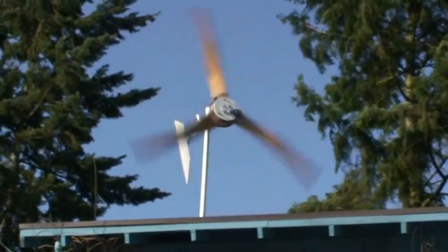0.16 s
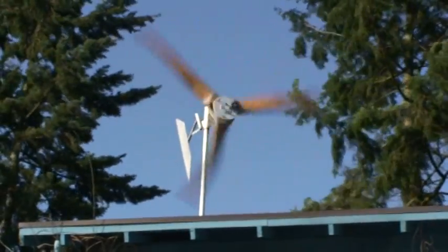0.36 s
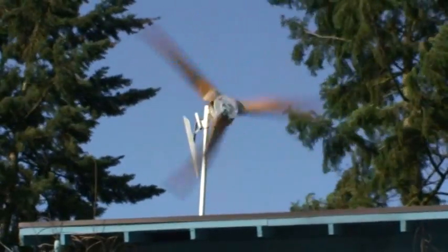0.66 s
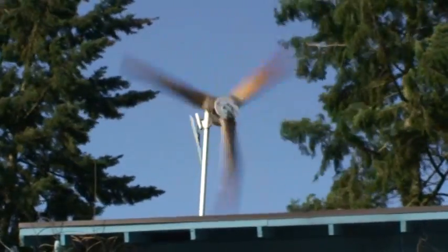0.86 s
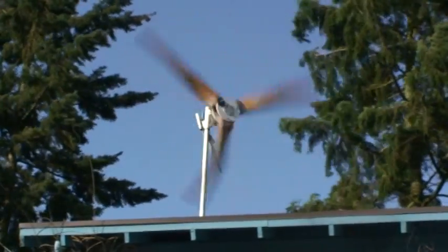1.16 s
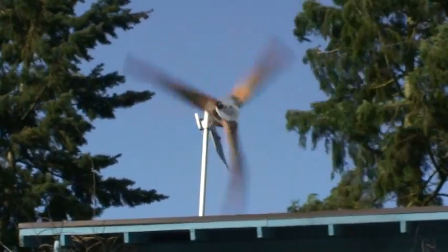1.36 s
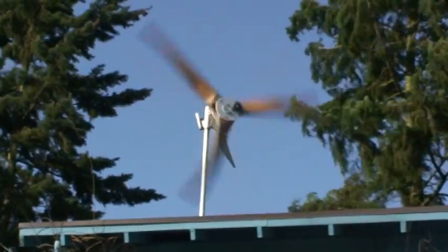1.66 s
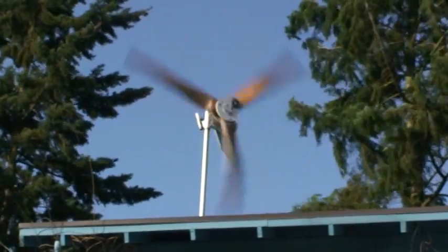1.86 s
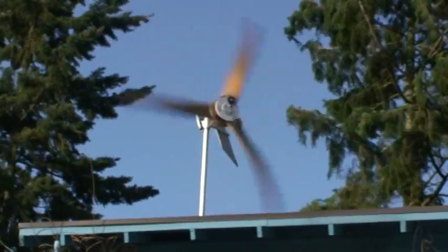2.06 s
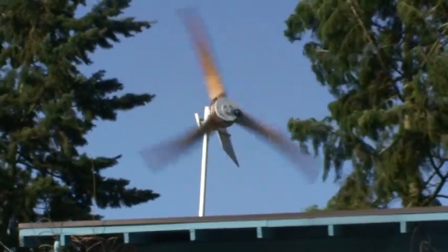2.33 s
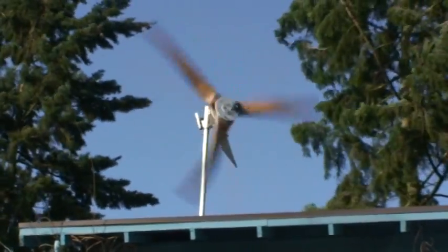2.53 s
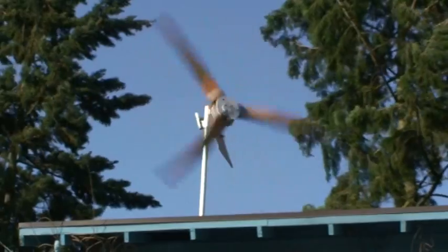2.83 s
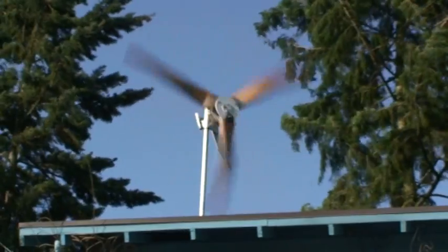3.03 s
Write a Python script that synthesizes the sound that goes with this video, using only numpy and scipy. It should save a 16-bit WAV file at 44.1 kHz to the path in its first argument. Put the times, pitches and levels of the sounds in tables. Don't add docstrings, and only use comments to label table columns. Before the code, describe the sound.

Gusty wind hits a small camera's two microphone holes, making low, rough rumble with rapid irregular thumps and dry snaps, differing left and right. It is strongest and deepest at the start; around 0.5 s the input chokes and clicks, and near 0.7 s a tiny rising whistle slips by. Buffeting continues, its steady flow thinning around 2.3 s, then puffs return until 3.2 s. Faint needle and blade hiss lies behind.

```python
import sys
import numpy as np
from scipy import signal
from scipy.fft import rfft, irfft, next_fast_len
from scipy.io import wavfile
from scipy.ndimage import uniform_filter1d

SR = 44100
rng = np.random.default_rng(int(sys.argv[2]) if len(sys.argv) > 2 else 0)


def invert_db(level):
    return 10 ** (np.asarray(level, dtype=float) / 20)


def dump(signal):
    limited = np.clip(np.atleast_2d(signal).T, -1, 1)
    pcm = np.round(limited * 32767).astype(np.int16)
    wavfile.write(sys.argv[1], SR, pcm)


N = 140679


def rms_one(x):
    return x / np.sqrt(np.mean(x ** 2) + 1e-20)


def filtered(x, order, hz, kind="low"):
    return signal.sosfilt(signal.butter(order, hz, kind, fs=SR, output="sos"), x)


def filtered_both_ways(x, hz, kind="low"):
    return signal.sosfiltfilt(signal.butter(2, hz, kind, fs=SR, output="sos"), x)


def in_time(rows):
    seconds, *columns = np.transpose(rows)
    return [np.interp(np.arange(N) / SR, seconds, column) for column in columns]


def at_hz(points, hz):
    known_hz, values = np.array(points).T[:2]
    return np.interp(np.log(hz), np.log(known_hz), values)


def drift(rate, channels=1):
    pole = np.exp(-80 * np.pi * rate / SR)
    noise = rng.standard_normal((channels, N // 40 + 2002))
    slow = signal.lfilter([1], [1, -2 * pole, pole * pole], noise)[:, 2000:]
    time = np.arange(N) / 40
    return np.array([np.interp(time, np.arange(len(path)), rms_one(path)) for path in slow])


def octaves(source, spectrum, likeness, centres):
    # pitch in Hz, left minus right in dB.
    port_difference = [(60, 1), (180, 2.5), (550, 1), (1650, -2.5), (4970, -1.5), (15000, 1)]
    size = next_fast_len(N)
    hz = np.maximum(np.arange(size // 2 + 1) * SR / size, 1)
    alike = np.clip(at_hz(likeness, hz), -.99, .99)
    for centre in centres:
        left, right = rfft(source(centre), size)
        mid = np.sqrt(1 + alike) * (left + right) / 2
        side = np.sqrt(1 - alike) * (left - right) / 2
        slice_gain = np.clip(1 - abs(np.log2(hz / centre)), 0, 1) * invert_db(at_hz(spectrum, hz))
        lean = invert_db(at_hz(port_difference, centre) * np.array([[.5], [-.5]]))
        stereo = irfft(slice_gain * np.array([mid + side, mid - side]), size)[:, :N]
        yield centre, lean * stereo


def pokes(rate):
    chance, direction, size = rng.random((3, 2, N))
    spread_db = 2.5
    sizes = invert_db(-spread_db * np.log(size + 0.0029))
    return rms_one((chance < rate / SR) * np.sign(direction - .5) * sizes)


def evened(band, hz):
    even_s, even_share = .045, .6
    power = uniform_filter1d(np.mean(band ** 2, axis=0), int(max(even_s, 4 / hz) * SR))
    return band * (power / power.mean() + .02) ** (-even_share / 2)


def buffeting(gain):
    # time in seconds, level in dB, brightness in dB per octave.
    flow_rows = [(0, -20.5, -14), (.13, -29, -5.5), (.28, -28.5, -6.5), (.42, -26.5, 7), (.57, -31.5, 9.5),
                 (.69, -30, 8), (.9, -23.5, 1), (1.1, -27, 2), (1.19, -32, 3.5), (1.3, -27.5, 1.5),
                 (1.7, -28.5, 1), (1.98, -27, -1.5), (2.07, -34.5, 0), (2.3, -44.5, 3), (2.6, -33.5, -7),
                 (2.9, -24.5, -1.5), (3.02, -36.5, -1), (3.19, -39.5, -10)]
    # centre in seconds, length in seconds, level in dB, brightness in dB per octave.
    puff_rows = [(0.017, 0.039, -25, 1), (0.072, 0.04, -25, 3.5), (0.213, 0.07, -22.5, 1.5),
                 (0.329, 0.031, -19.5, -1), (0.366, 0.035, -24.5, 0), (0.45, 0.024, -22.5, -7),
                 (0.491, 0.041, -27.5, 6), (0.604, 0.055, -28.5, -27), (0.772, 0.071, -28.5, 5.5),
                 (0.961, 0.034, -26, 1), (1.029, 0.052, -29.5, 5), (1.265, 0.012, -20.5, 2),
                 (1.412, 0.098, -28, 0), (1.483, 0.049, -28.5, 4), (1.635, 0.028, -30.5, 6.5),
                 (1.791, 0.063, -25, -1), (1.992, 0.075, -26, 3.5), (2.084, 0.02, -25, 1),
                 (2.149, 0.041, -22, -3.5), (2.22, 0.049, -26.5, -2.5), (2.271, 0.015, -22.5, -8.5),
                 (2.334, 0.024, -22.5, -4), (2.412, 0.074, -25.5, 1), (2.499, 0.07, -34.5, 1.5),
                 (2.567, 0.051, -25.5, 0), (2.711, 0.031, -23, 1), (2.791, 0.045, -21, -4),
                 (2.919, 0.04, -27.5, -0.5), (3.075, 0.025, -22, -0.5), (3.137, 0.0095, -27.5, -5)]
    # pitch in Hz, strength in dB per Hz.
    eddy_spectrum = [(13, -18), (25, -5), (45, 0), (90, -1), (200, -2.5), (450, -7.5), (900, -22),
                     (1500, -35), (2600, -51)]
    # pitch in Hz, left-right likeness (1 is the same).
    eddy_likeness = [(30, 1), (60, 0.99), (130, 0.59), (290, -0.045), (640, -0.24), (1400, 0.35)]
    eddies_per_cycle, big_eddies_per_s = .7, 200
    big_share, big_top_hz = .56, 524
    lump_db, lumps_per_s = 1.6, 22
    pivot_hz, tilt_octaves = 220, 2.02
    puff_edge = 6.0
    smear_cycles = 2.16

    t = np.arange(N) / SR
    flow_db, tilt_db = in_time(flow_rows)
    big = signal.hilbert(pokes(big_eddies_per_s)).imag
    lumps = drift(lumps_per_s, channels=2)
    shapes = [np.exp(-abs(2 * (t - s) / length) ** puff_edge) for s, length, _, _ in puff_rows]

    def eddies(hz):
        share = big_share / (1 + (hz / big_top_hz) ** 2)
        return np.sqrt(share) * big + np.sqrt(1 - share) * pokes(eddies_per_cycle * hz)

    out, plain = 0, 0
    for hz, band in octaves(eddies, eddy_spectrum, eddy_likeness, 25 * 2. ** np.arange(8)):
        band = evened(band, hz)
        up = np.clip(np.log2(hz / pivot_hz), 0, tilt_octaves)
        steady = gain * invert_db(flow_db + tilt_db * up + lump_db * lumps)
        puff_power = 0
        for (_, _, db, bright_db), shape in zip(puff_rows, shapes):
            puff_power = puff_power + invert_db(2 * (db + bright_db * up)) * shape
        strength = np.sqrt(steady ** 2 + puff_power)
        out = out + band * uniform_filter1d(strength, int(smear_cycles * SR / hz) + 1)
        plain = plain + band
    return out / np.sqrt(np.mean(plain ** 2))


def lone_eddies(rows):
    pull_share, calm_widths = .55, 2.1
    t, out, room = np.arange(N) / SR, 0, 0
    for s, width, *heights in rows:
        u = np.maximum((t - s) / width + .6, 0)
        push = 5.1 * u ** 2 * np.exp(-u ** 2 * 1.9)
        pull = pull_share * np.minimum(u, 1) * np.exp(-(u - 2.1) ** 2)
        out = out + (push - pull) * np.array(heights)[:, None]
        room = np.maximum(room, np.exp(-((t - s - width) / (calm_widths * width)) ** 2))
    return out, room


def wind(gain):
    # time in seconds, width in seconds, height.
    thump_rows = [(0.0046, 0.0054, 0.15), (0.0418, 0.0052, 0.13), (0.082, 0.0028, 0.11),
                  (0.1998, 0.0033, 0.1), (0.2351, 0.0032, -0.088), (0.3225, 0.0021, 0.18),
                  (0.3575, 0.0032, 0.15), (0.4562, 0.004, -0.2), (0.5021, 0.004, -0.13),
                  (0.6854, 0.0081, -0.14), (0.7381, 0.014, 0.11), (0.8398, 0.0059, 0.027),
                  (0.9665, 0.0047, -0.13), (1.0028, 0.0026, -0.17), (1.2468, 0.0032, 0.075),
                  (1.3299, 0.0053, -0.057), (1.3748, 0.0043, 0.099), (1.4124, 0.0025, 0.13),
                  (1.4707, 0.0029, 0.12), (1.6309, 0.0034, 0.12), (1.7484, 0.0019, -0.17),
                  (1.7938, 0.004, -0.024), (1.8356, 0.0021, -0.084), (1.9382, 0.0018, -0.15),
                  (1.9774, 0.0094, -0.11), (2.0332, 0.0068, -0.15), (2.1556, 0.0031, 0.16),
                  (2.2253, 0.0031, 0.11), (2.363, 0.0021, 0.11), (2.4309, 0.0095, -0.14),
                  (2.545, 0.0025, 0.096), (2.5874, 0.0066, -0.11), (2.6459, 0.0044, -0.091),
                  (2.7084, 0.0066, -0.16), (2.7673, 0.0086, -0.12), (2.8058, 0.0032, 0.12),
                  (2.9095, 0.0026, 0.14), (3.0754, 0.0034, 0.15)]
    # time in seconds, width in seconds, height left, height right.
    snap_rows = [(0.0068, 0.0011, 0.033, -0.35), (0.0533, 0.001, 0.097, -0.32),
                 (0.0865, 0.00057, -0.13, -0.089), (0.2071, 0.0014, 0.079, -0.27),
                 (0.2366, 0.00075, -0.18, 0.25), (0.3237, 0.0013, 0.25, -0.43),
                 (0.4278, 0.00063, 0.15, -0.17), (0.452, 0.00065, 0.18, -0.38),
                 (0.505, 0.0005, -0.48, 0.29), (0.6529, 0.00095, 0.022, 0.26),
                 (0.6903, 0.00069, 0.071, -0.32), (0.7398, 0.0005, 0.00019, -0.11),
                 (0.798, 0.0008, -0.29, 0.036), (0.82, 0.00067, -0.32, 0.13),
                 (0.8417, 0.0011, -0.21, -0.056), (0.8821, 0.0018, -0.37, -0.12),
                 (0.9131, 0.0008, 0.047, -0.28), (0.9463, 0.0014, -0.081, -0.29),
                 (1.0053, 0.0016, -0.21, 0.091), (1.0372, 0.00067, -0.15, 0.21),
                 (1.0649, 0.0011, -0.016, 0.26), (1.0998, 0.0016, -0.18, -0.28),
                 (1.266, 0.0015, 0.24, 0.15), (1.3136, 0.0021, 0.17, 0.39), (1.3391, 0.0012, 0.1, -0.13),
                 (1.4175, 0.0016, 0.21, -0.07), (1.4786, 0.0015, -0.24, -0.18), (1.505, 0.002, 0.35, 0.4),
                 (1.6007, 0.001, 0.18, -0.067), (1.632, 0.0013, 0.12, -0.22),
                 (1.6656, 0.00066, -0.25, 0.088), (1.7739, 0.00095, 0.083, -0.25),
                 (1.8176, 0.00073, -0.1, 0.033), (1.8376, 0.0018, 0.47, -0.033),
                 (1.9428, 0.00063, -0.14, 0.18), (1.9679, 0.0014, 0.2, -0.16),
                 (1.9891, 0.00074, 0.23, 0.18), (2.0353, 0.001, -0.22, -0.099),
                 (2.1363, 0.00093, 0.14, 0.16), (2.3853, 0.0023, -0.23, 0.33),
                 (2.4122, 0.0013, -0.038, -0.25), (2.4399, 0.00058, -0.21, 0.099),
                 (2.557, 0.00087, -0.011, 0.24), (2.6874, 0.001, 0.21, -0.032),
                 (2.7197, 0.0011, 0.054, -0.4), (2.7782, 0.0016, 0.17, 0.23),
                 (2.9054, 0.0011, 0.37, -0.025), (3.0774, 0.0009, 0.32, -0.17)]
    # time in seconds, width in seconds,
    # height left, height right.
    further_snap_rows = [(.464, 0.0021, 0.5, 0.083), (.4893, 0.00041, 0.19, 0.096), (0.596, 0.0017, -0.016, -0.11),
                         (2.332, 0.00081, 0.077, .096), (2.807, 0.00074, 0.11, 0.092), (2.934, 0.001, 0.16, 0.014)]
    thump_calm, snap_calm = .61, .75
    stream = buffeting(gain)
    thumps, deep_room = lone_eddies(thump_rows)
    snaps, sharp_room = lone_eddies(snap_rows + further_snap_rows)
    deep = filtered_both_ways(stream, 257)
    snaps = filtered_both_ways(snaps, 200, "high")
    thumps = filtered_both_ways(thumps, 35, "high")
    calmed_deep = deep * (1 - thump_calm * deep_room)
    calmed_rest = (stream - deep) * (1 - snap_calm * sharp_room)
    return calmed_deep + calmed_rest + thumps + snaps


def whistle():
    centre_s, length_s, level_db = .705, .0566, -31
    hz, rise_hz_per_s = 719, 6500
    t = np.arange(N) / SR - centre_s
    shape = np.exp(-(2 * t / length_s) ** 2) * invert_db(level_db + 7.2 * drift(60))
    return shape * np.sin(2 * np.pi * (hz * t + rise_hz_per_s * t ** 2 / 2) + drift(45))


def clicks():
    # time in seconds, height, rise time in seconds.
    jump_rows = [(.51655, .25, .00005), (.5186, -.15, .00004), (.51865, -.5, .00024), (.5189, .37, .00004),
                 (.51985, -.17, .00005)]
    right_late_s = .000006
    t = np.arange(N) / SR - np.array([[0], [right_late_s]])
    jumps = sum(height * np.clip((t - s) / rise, 0, 1) for s, height, rise in jump_rows)
    sag = filtered(jumps, 2, 550, "high")
    sag = sag - .15 * filtered(sag, 1, [3500, 7000], "band")
    return filtered(sag, 1, 14000)


def rustle():
    # time in seconds, level in dB, brightness in dB per octave.
    rustle_rows = [(0, -45.5, -1), (.3, -45.5, -2.5), (.485, -47.5, -1.5), (.505, -32, -1),
                   (.53, -49, -0.5), (.7, -49, 0), (.84, -43.5, -3.5), (.92, -47, -4), (1.1, -48, -2),
                   (1.47, -48.5, -1.5), (1.6, -47.5, -2.5), (1.9, -47.5, -2.5), (2.0, -44.5, -2.5),
                   (2.08, -49.5, -0.5), (2.4, -48.5, -1.3), (2.8, -49, -1), (3.05, -48, -2),
                   (3.19, -50.5, -1.5)]
    # pitch in Hz, strength in dB per Hz.
    leaf_spectrum = [(400, -14), (1170, -12.5), (2770, -16), (6740, -24), (10600, -38.5), (11800, -35),
                     (13500, -43.5), (14300, -68)]
    # pitch in Hz, left-right likeness (1 is the same).
    leaf_likeness = [(700, 0), (1400, .2), (3100, .62), (6800, .76), (10200, .68), (11500, .97)]
    patch_db, swell_db = 1.0, .43
    white = rng.standard_normal((2, N))
    swell = drift(21)
    level_db, tilt_db = in_time(rustle_rows)
    hiss = 0
    for hz, band in octaves(lambda hz: white, leaf_spectrum, leaf_likeness, 250 * 2. ** np.arange(8)):
        band_db = patch_db * drift(10.0) + swell_db * swell + tilt_db * np.log2(hz / 3000)
        hiss = hiss + band * invert_db(band_db)
    hiss = filtered(hiss, 1, 300, "high")
    bright = filtered(hiss, 2, 1500, "high")
    return invert_db(level_db) * hiss / np.sqrt(np.mean(bright ** 2))


def glints():
    level_db, swing_db, glints_per_s = -100, 6.0, 18
    edges = np.linspace(13700, 16500, 8)
    white, shared = rng.standard_normal(N), drift(glints_per_s)
    out = 0
    for band in zip(edges, edges[1:]):
        patch = rms_one(filtered(white, 3, band, "band"))
        out = out + patch * invert_db(level_db + swing_db * (drift(glints_per_s) + shared / 2 - 1))
    return out


def ridden_gain():
    # time in seconds, depth in dB.
    duck_rows = [(0.088, 6.5), (.2, 8.5), (0.324, 8), (.355, 10), (0.462, 19), (0.525, 11.5), (.54, 3),
                 (0.612, 10), (.74, 8), (0.916, 8), (.96, 4.5), (2.333, 17), (2.425, 8), (2.775, 10),
                 (2.81, 3.5), (2.902, 10.5), (2.925, 14.5), (2.96, 7)]
    duck_s, recover_s = .0054, .044
    t, loss_db = np.arange(N) / SR, 0
    for s, depth_db in duck_rows:
        late = np.maximum(t - s, 0)
        loss_db = loss_db + depth_db * (1 - np.exp(-late / duck_s)) * np.exp(-late / recover_s)
    return invert_db(-loss_db)


def scene():
    gain = ridden_gain()
    return wind(gain) + whistle() + gain * (rustle() + glints()) + clicks()


def stalled(dry):
    start, end = int(.4842 * SR), int(.4886 * SR)
    t = np.arange(N)
    stuck = np.clip(np.minimum((t - start) / 60 + 1, (end - t) / 25 + 1), 0, .985)
    resting = .055 - .02 * (t - start) / (end - start)
    return dry + stuck * (resting - dry)


def band_limit(x):
    return signal.sosfilt(signal.butter(12, 16560, fs=SR, output="sos"), x)


def record(dry):
    rounded = .5 * np.tanh(stalled(dry) / .5)
    fade_in = np.minimum(np.arange(N) / 100, 1)
    return band_limit(rounded * fade_in)


dry = scene()
out = record(dry)
dump(out)
```